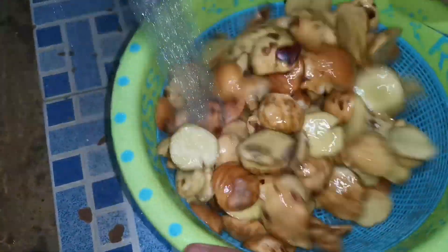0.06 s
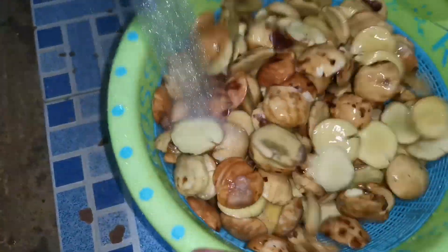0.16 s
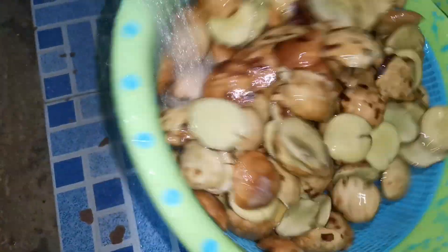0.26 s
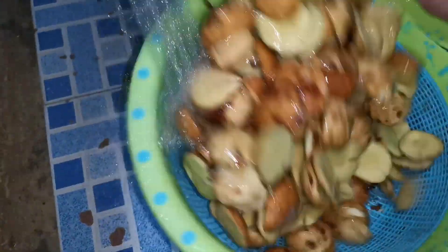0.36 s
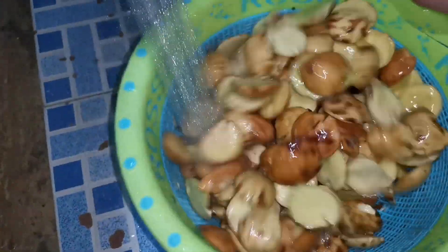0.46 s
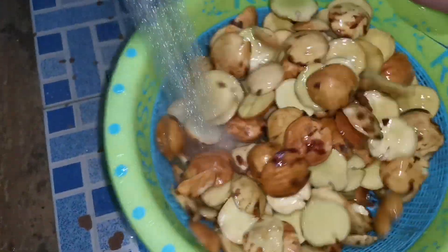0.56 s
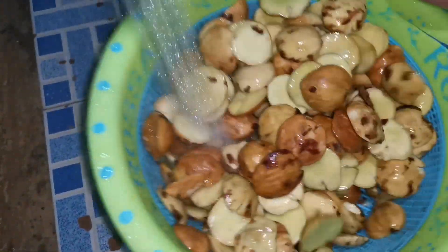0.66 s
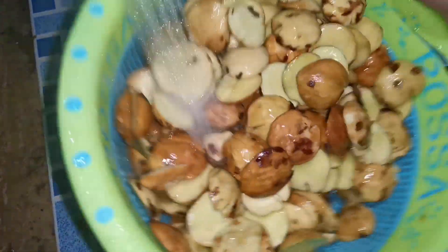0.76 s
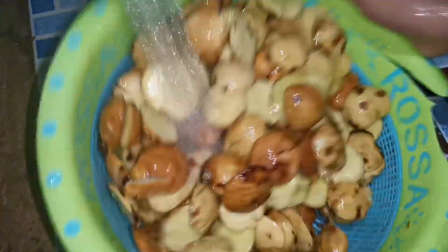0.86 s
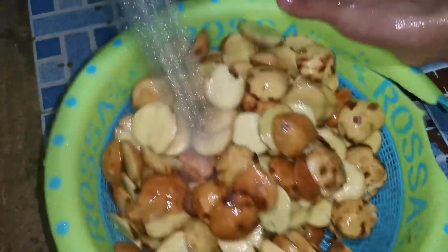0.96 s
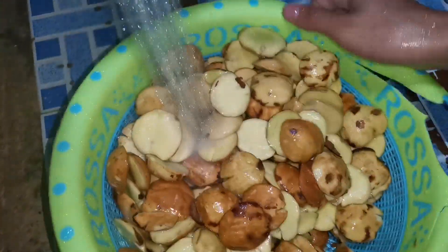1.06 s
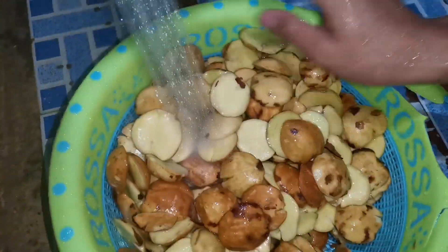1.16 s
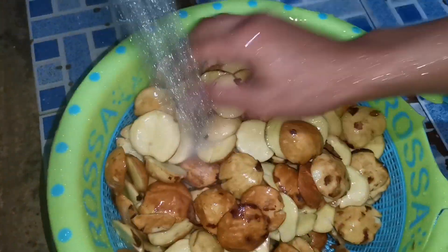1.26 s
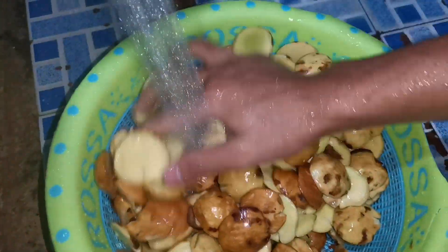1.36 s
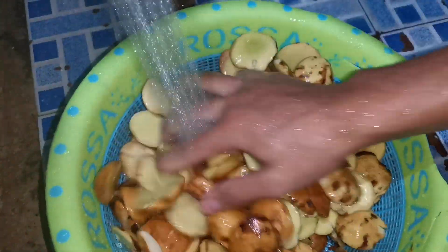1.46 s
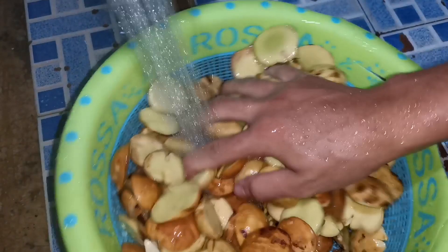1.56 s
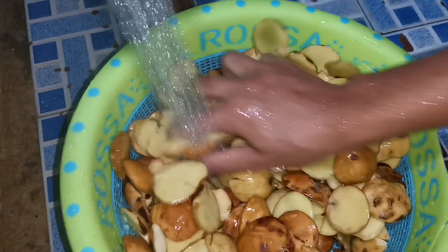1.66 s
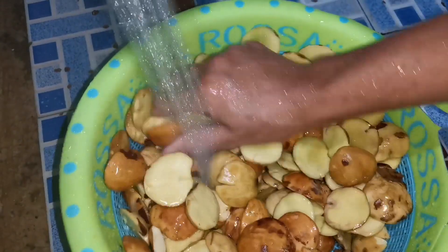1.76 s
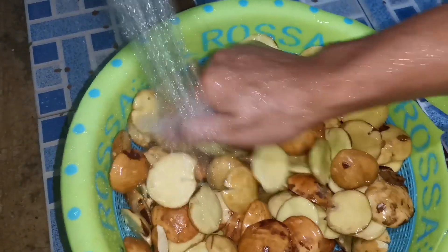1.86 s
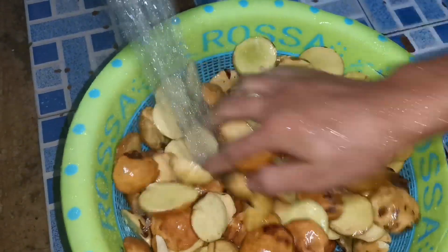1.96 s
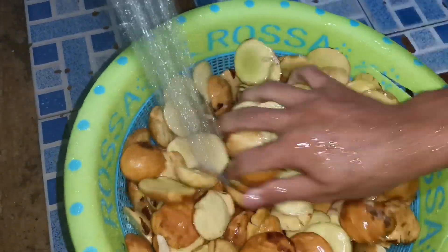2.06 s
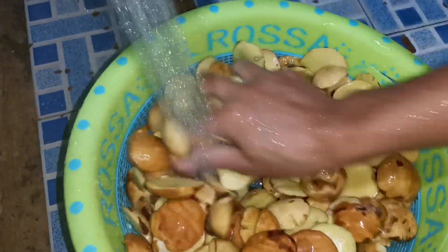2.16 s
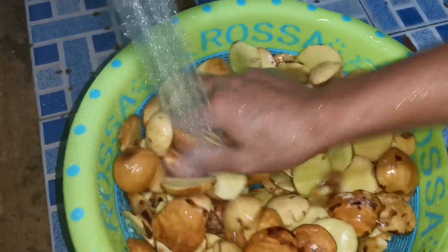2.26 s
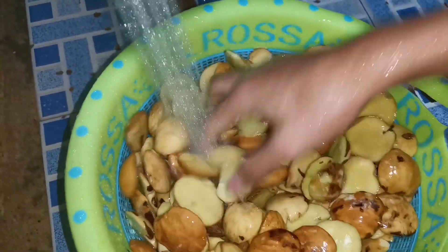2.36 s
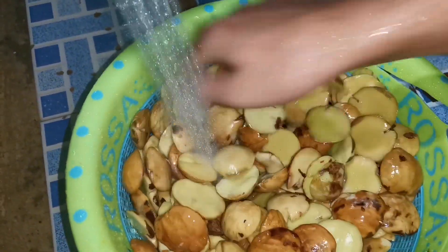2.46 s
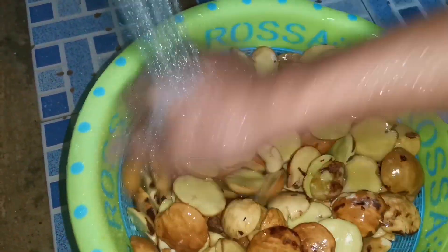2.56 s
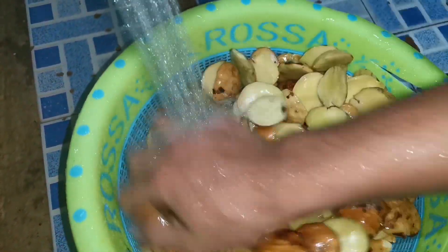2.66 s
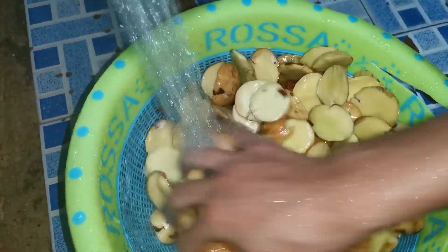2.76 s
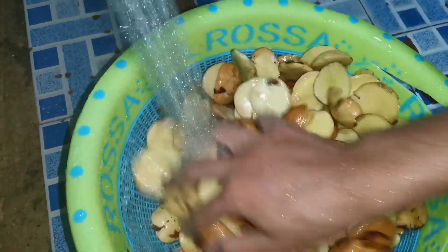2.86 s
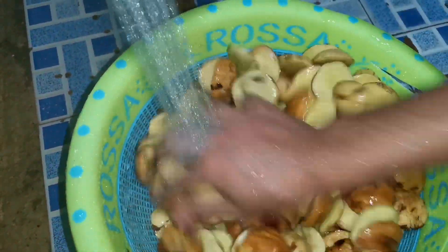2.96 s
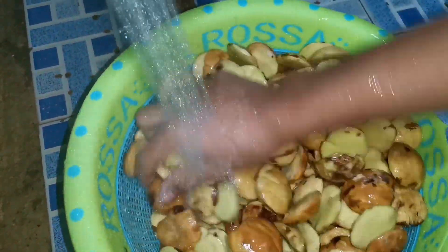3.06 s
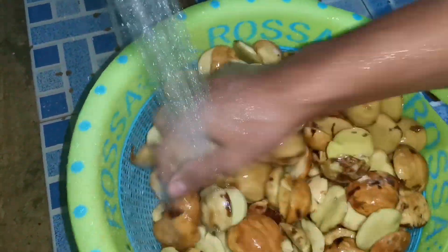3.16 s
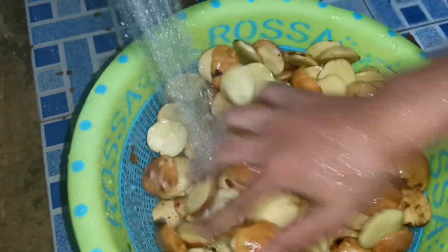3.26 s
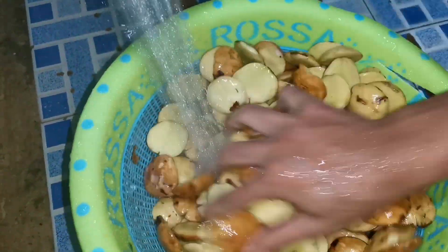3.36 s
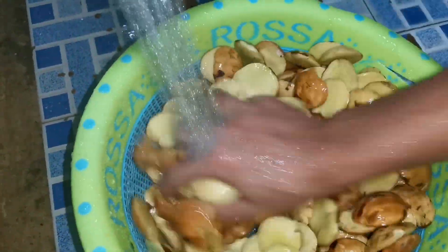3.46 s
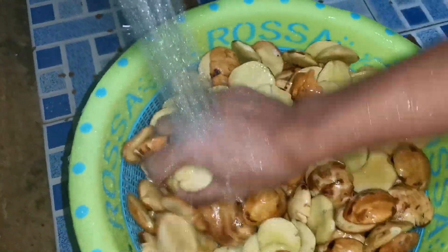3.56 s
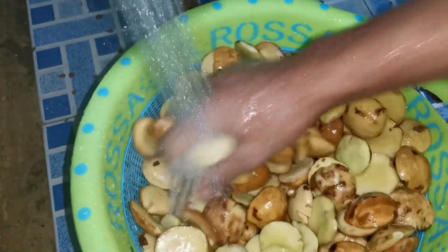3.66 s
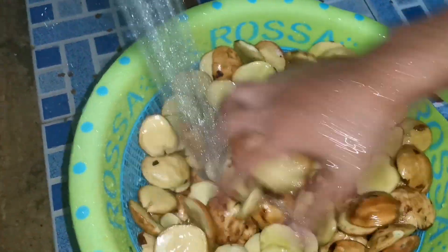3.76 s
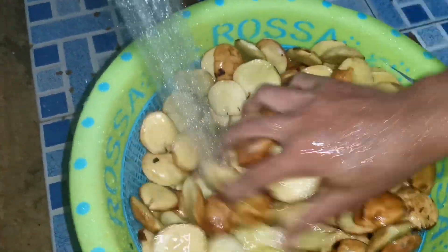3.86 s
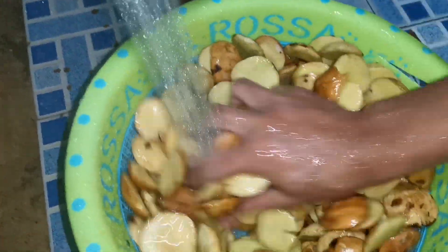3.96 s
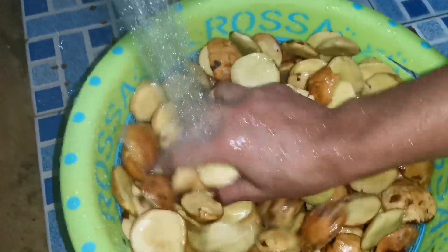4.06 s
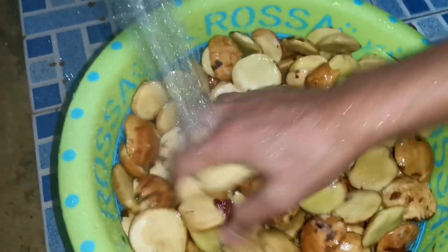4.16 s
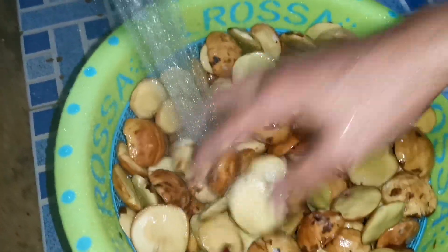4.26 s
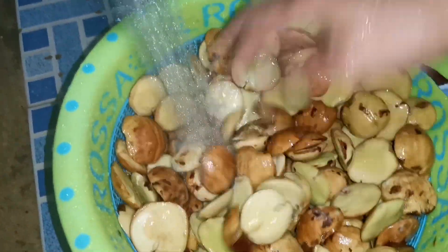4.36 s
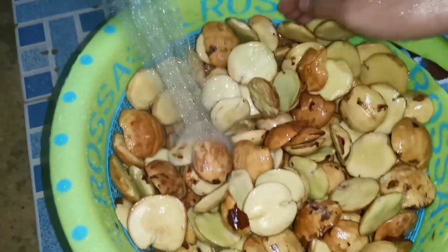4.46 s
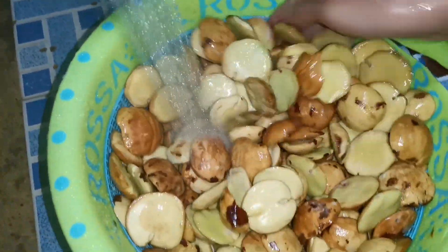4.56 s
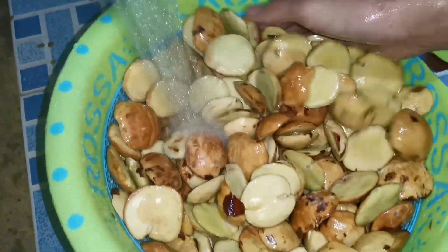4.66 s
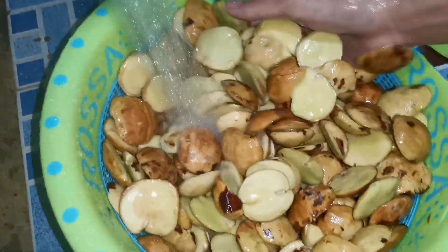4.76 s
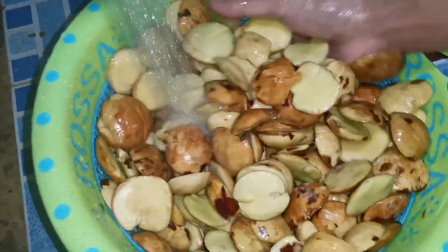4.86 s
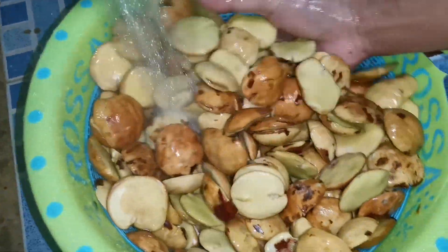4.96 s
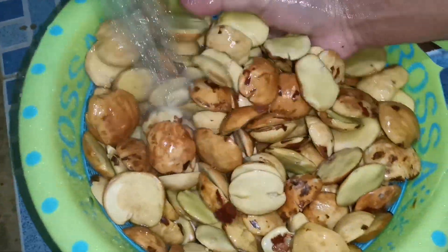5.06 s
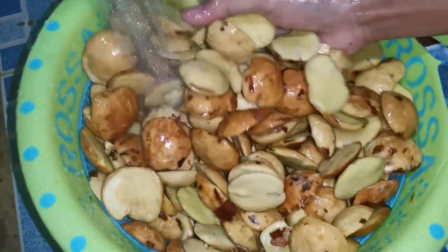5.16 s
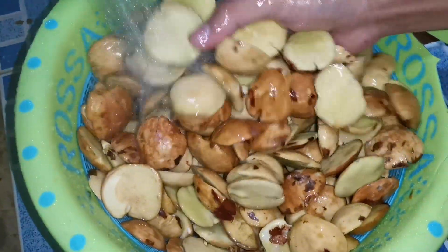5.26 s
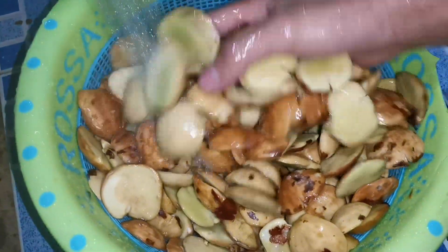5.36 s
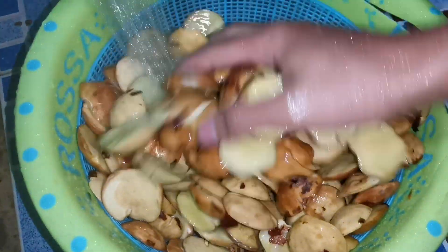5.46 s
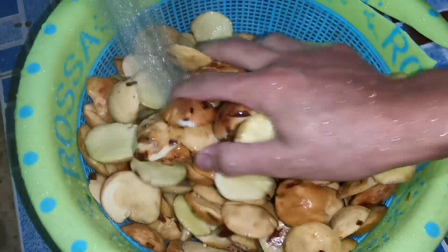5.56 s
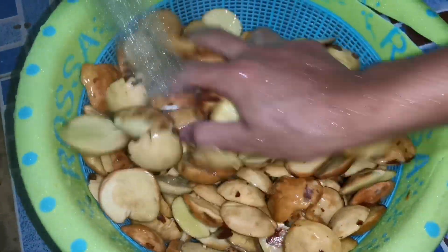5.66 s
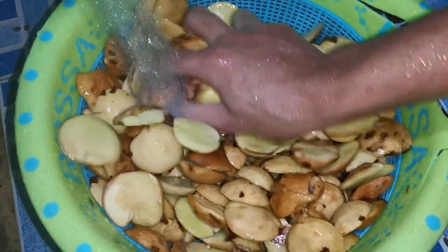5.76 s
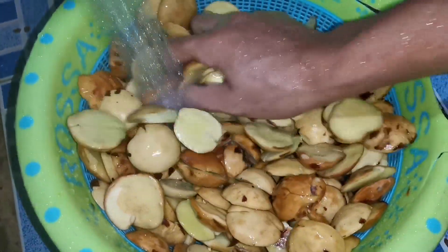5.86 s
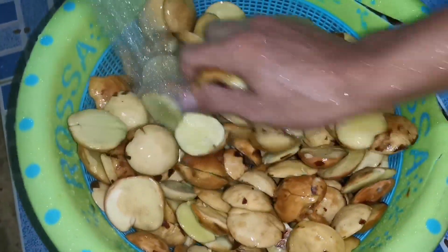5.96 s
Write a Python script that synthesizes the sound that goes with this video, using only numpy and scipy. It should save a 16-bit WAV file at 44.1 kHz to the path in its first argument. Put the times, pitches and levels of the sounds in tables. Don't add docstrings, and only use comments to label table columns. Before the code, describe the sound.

Three rattling tosses of hard wet pieces in a plastic basket under a splashing tap, then gentle stirring, ticking drops and a low engine hum.

```python
import sys
import numpy as np
from scipy import signal
from scipy.fft import rfft, irfft
from scipy.io import wavfile
from scipy.ndimage import uniform_filter1d

SR = 44100
rng = np.random.default_rng(int(sys.argv[2]) if len(sys.argv) > 2 else 0)


def volts(x):
    e = np.asarray(x, float) / 20
    return 10 ** e


def transcribe(u):
    v = np.clip(np.atleast_2d(u).T, -1, 1)
    q = np.round(v * 32767).astype(np.int16)
    wavfile.write(sys.argv[1], SR, q)


N = 264600
SWELL_SHAPE = 1.51


def rms_one(x):
    return x / np.sqrt(np.mean(x ** 2) + 1e-20)


def in_time(rows):
    s, *columns = np.transpose(rows)
    return [np.interp(np.arange(N) / SR, s, c) for c in columns]


def at_hz(points, hz):
    points = np.array(points)
    return np.interp(np.log(hz), np.log(points[:, 0]), points[:, 1])


def drift(rate):
    r = np.exp(-80 * np.pi * rate / SR)
    slow = signal.lfilter([1], [1, -2 * r, r * r], rng.standard_normal(N // 40 + 2002))[2000:]
    return np.interp(np.arange(N) / 40, np.arange(len(slow)), rms_one(slow))


def grains(per_s, spread_db):
    sizes_db = spread_db * np.minimum(rng.exponential(1, (2, N)), 4)
    sizes = volts(sizes_db) * rng.choice([-1, 1], (2, N))
    return rms_one(sizes * (rng.random((2, N)) < per_s / SR)) + 1e-18


def coloured(x, spectrum):
    hz = np.maximum(np.fft.rfftfreq(N, 1 / SR), 1)
    lowest = spectrum[0][0]
    edge_db = np.where(hz < lowest, 30 * np.log2(hz / lowest), 0)
    return rms_one(irfft(rfft(x) * volts(at_hz(spectrum, hz) + edge_db), N))


def resonance(x, hz, width):
    r = np.exp(-np.pi * width / SR)
    zeros = np.array([1, 0, -1]) * (1 - r * r) / 2
    return signal.lfilter(zeros, [1, -2 * r * np.cos(2 * np.pi * hz / SR), r * r], x)


def band(x, low_hz, high_hz):
    return signal.sosfilt(signal.butter(2, [low_hz, high_hz], "band", fs=SR, output="sos"), x)


def swells(rows, shape=SWELL_SHAPE):
    rows = np.array(rows)
    apart = (np.arange(0, N, 49) / SR - rows[:, :1]) / rows[:, 1:2]
    return np.exp(-np.abs(apart) ** shape)


def stretch(coarse):
    return np.interp(np.arange(N) / 49, np.arange(len(coarse)), coarse)


def summed_db(rows, db, rest_db, shape=SWELL_SHAPE):
    power = volts(np.array(db)) ** 2 @ swells(rows, shape) ** 2 + volts(rest_db) ** 2
    return stretch(10 * np.log10(power))


def stream():
    # (time [s], level [dB])
    flow = [(0, 6), (.35, 4.5), (.73, 2), (1.37, 3), (1.72, 5.5), (2.0, 2.5), (2.17, 2), (3.26, 5.5),
            (3.36, 0), (3.81, 5.5), (3.86, 1.5), (4.14, 8), (4.45, 3.7), (5.05, 6.5), (5.41, 0.5), (6, 4)]
    # (time [s], half-length [s], loss [dB], share of the loss in the lower bands)
    breaks = [(0.0, 0.011, 16, 0.3), (0.102, 0.044, 14, 0.8), (0.213, 0.039, 4.5, 1.8),
              (0.456, 0.062, 6.5, 1), (0.624, 0.043, 5.5, 1.7), (1.46, 0.053, 5, 1.6),
              (1.652, 0.076, 12.5, 0.7), (2.1, 0.046, 9.5, 0.26), (2.954, 0.28, 2.5, 2.4),
              (3.32, 0.019, 3, 2.5), (4.046, 0.28, 2.3, 2.4), (4.36, 0.031, 9, .8), (4.81, 0.48, 2.5, 2.35),
              (5.41, 0.29, 0.24, 2.5), (6.0, 0.22, 2.5, 2.5)]
    # (time [s], half-length [s], level [dB])
    sloshes = [(0.0, 0.034, -36), (0.123, 0.089, -32), (0.548, 0.077, -31.5), (0.306, 0.13, -42),
               (1.733, 0.12, -40.5), (2.074, 0.073, -43.5), (2.833, 0.48, -45), (3.43, 0.13, -41),
               (3.883, 0.059, -40.5), (4.19, 0.29, -42.5), (4.975, 0.093, -41.5), (6.0, 0.26, -46)]
    flow_db, = in_time(flow)
    _, _, loss_db, reach = np.transpose(breaks)
    high_loss = stretch(loss_db @ swells(breaks))
    low_loss = stretch(loss_db * reach @ swells(breaks))
    slosh = volts(summed_db(sloshes, np.array(sloshes)[:, 2], -90))
    splash = np.hypot(volts(-44.5 + 0.022 * flow_db - 0.34 * low_loss), slosh)
    sizzle = np.hypot(volts(-48.5 + flow_db - low_loss), slosh * volts(-11.5))
    mist_db = -43 + flow_db - high_loss
    return 20 * np.log10(splash), 20 * np.log10(sizzle), mist_db


def spray():
    # (frequency [Hz], level [dB])
    water = [(300, -9), (550, -3), (950, -4), (1700, -5.5), (2500, -6.5), (3600, -4.5), (4900, -3),
             (5900, -10), (7000, -5.5), (8200, -9.5), (10500, 6), (12700, 1), (14000, -4.5), (15600, -9.5)]
    patchy_db, shared_db = 1.25, 1.0
    splash_db, sizzle_db, mist_db = stream()
    drops = coloured(0.73 * rng.standard_normal((2, N)) + 0.66 * grains(2500, 4.0), water)
    splash_db = splash_db - 20 * np.log10(np.std(band(drops, 2000, 5200)))
    sizzle_db = sizzle_db - 20 * np.log10(np.std(band(drops, 5600, 7600))) + 4
    mist_db = mist_db - 20 * np.log10(np.std(band(drops, 8800, 14000)))
    place = 3 * np.log2(np.fft.rfftfreq(N, 1 / SR) / 1500 + 1)
    together = drift(10.2) + 1.06 * drift(41)
    spectrum, out = rfft(drops), 0
    for k, level_db in enumerate([splash_db] * 7 + [sizzle_db] * 2 + [mist_db] * 3):
        window = np.cos(np.pi / 2 * np.clip(place - k, -1, 1)) ** 2
        flicker_db = shared_db * together + patchy_db * (drift(5.9) + 0.9 * drift(28))
        out = out + irfft(spectrum * window, N) * volts(level_db + flicker_db)
    return volts(-1.0) * out


def trickle():
    cycles = 65.0
    born = grains(300 * volts(1.9 * drift(51)), 0.68)
    dealt = rng.integers(0, 24, N)
    rings = 0
    for k, hz in enumerate(np.geomspace(900, 6000, 24)):
        mine = born * (dealt == k) + 1e-18
        rings = rings + resonance(mine, hz, hz / cycles) * np.sqrt(2000 / hz)
    splash_db = stream()[0]
    return rms_one(rings) * volts(splash_db - 13)


def hollow():
    # (time [s], length [s], pitch [Hz], level [dB])
    cavities = [(0.268, 0.17, 4700, -38), (0.784, 0.096, 5100, -56), (0.856, 0.068, 6650, -66),
                (1.066, 0.042, 3000, -36), (1.542, 0.048, 4600, -29.5), (1.676, 0.069, 4750, -31.5),
                (1.677, 0.042, 2160, -29), (2.033, 0.067, 3920, -31), (2.203, 0.044, 4300, -31),
                (2.614, 0.04, 3000, -37), (2.493, 0.033, 4300, -35), (2.837, 0.1, 5000, -36),
                (3.228, 0.073, 3870, -35), (3.396, 0.25, 3140, -43), (3.715, 0.18, 5000, -51),
                (3.856, 0.081, 2900, -41), (4.015, 0.091, 4980, -32.5), (4.206, 0.14, 4970, -34),
                (4.134, 0.1, 4570, -34), (4.13, 0.11, 6000, -39.5), (4.14, 0.14, 6950, -35),
                (4.952, 0.25, 4870, -37), (4.993, 0.25, 2990, -46.5), (4.933, 0.19, 2750, -41),
                (5.546, 0.15, 4970, -41.5), (5.723, 0.061, 2780, -35.5)]
    out = np.zeros((2, N))
    for (s, length, hz, db), noise in zip(cavities, rng.standard_normal((len(cavities), 2, 16000))):
        count = min(round(length * SR), 16000)
        width = hz / (42.0 * length / 0.41)
        hiss = resonance(resonance(noise, hz, width), hz, width)[:, :count]
        at = round(s * SR)
        out[:, at:at + count] += volts(db - 8.5) * rms_one(hiss) * np.hanning(count) ** 0.5
    return out


def motion():
    # (time [s], half-length [s], clatter level [dB], tray thud level [dB])
    tosses = [(.01, 0.015, -22.5, -35), (0.097, 0.031, -21.5, -28.5), (0.158, 0.043, -17.5, -30),
              (0.232, 0.012, -27, -29), (0.278, 0.036, -35, -39), (0.52, 0.036, -20.5, -30),
              (0.575, 0.07, -25, -30), (0.74, 0.08, -34.5, -43.5), (0.867, 0.0091, -46.5, -34.5),
              (1.006, 0.031, -26, -33.5), (1.051, 0.034, -24, -39)]
    # (time [s], half-length [s], clatter level [dB])
    stirs = [(1.303, 0.64, -47.5), (1.695, 0.2, -45.5), (1.84, 0.034, -44), (2.201, 0.15, -42),
             (2.296, 0.027, -43.5), (2.596, 0.5, -47.5), (2.984, 0.26, -47.5), (3.027, 0.034, -42.5),
             (3.103, 0.029, -39.5), (3.183, 0.011, -36.5), (3.532, 0.13, -39), (3.735, 0.026, -95),
             (4.024, 0.098, -39), (4.21, 0.029, -48), (4.378, 0.054, -40.5), (4.64, 0.25, -45),
             (4.814, 0.043, -44.5), (4.938, 0.072, -49), (5.57, 0.26, -45), (5.814, 0.052, -41),
             (5.932, 0.034, -40)]
    tossed = [(s, length, db - 9, thud_db) for s, length, db, thud_db in tosses]
    stirred = [(s, length, db - 3, db - 1.5) for s, length, db in stirs]
    rows = np.array(tossed + stirred)
    shape = np.array([[1.7]] * len(tosses) + [[SWELL_SHAPE]] * len(stirs))
    return summed_db(rows, rows[:, 2], -58.5, shape), summed_db(rows, rows[:, 3], -51, shape)


def tumble():
    # (frequency [Hz], width [Hz], level [dB])
    colander = [(460, 1100, 11), (1090, 120, 25.5), (1623, 47, 19), (1850, 50, 26), (2380, 90, 21.5),
                (4070, 73, 18), (4370, 17, -19)]
    # (frequency [Hz], level [dB])
    pieces = [(150, -17), (250, -0.5), (327, -5), (521, 3.5), (588, -48), (653, -1), (1090, -0.5),
              (1320, 3.5), (4520, -12.5), (5250, -11), (9000, -42), (11700, -53), (19800, -120)]
    tumble_db, thud_db = motion()
    per_s = 2200 * volts(0.34 * (tumble_db + 33.5) + 3.2 * drift(40))
    contacts = grains(np.clip(per_s, 1200, 8000), 3.6)
    contacts = contacts / np.sqrt(uniform_filter1d(contacts ** 2, 900) + .03)
    scrunch = rfft(rng.standard_normal(200) * volts(-60 * np.arange(200) / SR / .004))
    contacts = signal.fftconvolve(contacts, irfft(scrunch / np.abs(scrunch))[None], axes=1)[:, :N]
    body = 0
    for k, (hz, width, db) in enumerate(colander):
        mode = resonance(contacts, hz, max(2.7 * width, 30)) * np.sqrt(300 / width)
        body = body + (-1) ** k * volts(db) * mode
    dealt = np.repeat(rng.integers(0, 16, N // 60 + 1), 60)[:N]
    clacks = 0
    for k, hz in enumerate(np.geomspace(520, 7500, 16)):
        mine = contacts * (dealt == k) + 1e-18
        clacks = clacks + resonance(mine, hz, 1.77 * hz / 10.0) * volts(at_hz(pieces, hz))
    clatter = rms_one(clacks) + 0.89 * rms_one(body)
    clatter = clatter / np.std(band(clatter, 330, 1730))
    thud = band(rms_one(contacts) + .5 * rng.standard_normal((2, N)), 150, 565)
    thud = rms_one(thud) + 0.07 * rms_one(resonance(thud, 257, 30))
    return clatter * volts(tumble_db) + thud * volts(thud_db - 3)


def hits(events, longer, crack_share, crack_hz, push_share):
    out, t = np.zeros((2, N + 2000)), np.arange(2000) / SR
    for (s, peak_db, hz), noise in zip(events, rng.standard_normal((len(events), 2, 2000))):
        turn = 2 * np.pi * hz * t + np.array([[0], [-np.pi / 2]])
        ringing = np.sin(turn) + .25 * (np.sin(1.17 * turn) + np.sin(.78 * turn))
        crack = crack_share * band(noise * volts(-60 * t / .01), *crack_hz)
        push = push_share * np.sin(2 * np.pi * 330 * t) * volts(-60 * t / 0.011)
        fading = np.exp(-(t / (longer * .0036)) ** 2) + .2 * volts(-60 * t / (longer * .03))
        onset = np.minimum(t / 0.0004, 1)
        at = round(s * SR)
        out[:, at:at + 2000] += volts(peak_db - 5) * (ringing * fading + crack + push) * onset
    return out[:, :N]


def knocks():
    # (time [s], peak level [dB], pitch [Hz])
    toss_knocks = [(0.009, -15.5, 3430), (0.061, -26, 2920), (0.078, -16, 2320), (0.084, -19, 2550),
                   (0.098, -10.5, 2600), (0.111, -10.5, 1480), (0.117, -20, 1090), (0.134, -17, 1190),
                   (0.158, -14, 1520), (0.158, -22, 1080), (0.161, -11.5, 1120), (0.166, -12.5, 970),
                   (0.171, -12, 1220), (0.176, -14, 1470), (0.184, -19, 1090), (0.2035, -11, 2480),
                   (0.215, -11.5, 1800), (0.221, -19, 860), (0.286, -19, 1890), (0.477, -27, 826),
                   (0.49, -16.5, 2520), (0.508, -19, 700), (0.508, -18, 835), (0.516, -19, 1330),
                   (0.521, -16, 1130), (0.534, -14, 940), (0.539, -16, 1150), (0.547, -15, 775),
                   (0.555, -16.5, 2400), (0.569, -21, 2680), (0.58, -14.5, 910), (0.585, -9.5, 1790),
                   (0.59, -19, 2370), (0.599, -14.5, 934), (0.614, -33, 960), (0.625, -25, 900),
                   (0.683, -28, 750), (0.735, -28, 780), (0.862, -32, 920), (0.981, -10.5, 1260),
                   (0.994, -20, 1070), (1.0, -15, 1030), (1.012, -17, 1200), (1.018, -14.5, 814),
                   (1.035, -21, 910), (1.055, -27, 3240), (1.06, -44, 703), (1.06, -20, 2930),
                   (0.079, -33, 4730), (0.111, -21, 4450), (0.134, -35, 4800), (0.15, -19, 2500),
                  (0.16, -19, 4380), (0.182, -15, 2570), (0.186, -23, 1010), (0.213, -23, 1080),
                  (0.483, -26, 3400), (0.497, -25, 4500), (0.509, -20, 2700), (0.517, -16, 2280),
                  (0.54, -23, 4600), (0.562, -18, 2550), (0.585, -28, 4350), (0.605, -20, 2300),
                  (0.622, -29, 2480), (0.98, -22, 2680), (1.012, -23.5, 4700), (1.036, -16.5, 2390),
                  (1.049, -23, 2450), (1.063, -25, 1120), (1.062, -23, 4420), (1.068, -24, 3370),
                  (1.075, -20, 3920)]
    stir_knocks = [(1.282, -32, 1120), (1.302, -30, 1050), (1.371, -28, 930), (1.408, -40, 3900),
                   (1.549, -31, 4160), (1.68, -25, 4220), (1.811, -36, 2560), (2.032, -24, 3936),
                   (2.063, -18.5, 3930), (2.222, -26, 4200), (2.327, -24.5, 3970), (2.457, -25, 2320),
                   (2.482, -29, 4456), (2.558, -21.5, 3880), (2.676, -22.5, 2380), (2.722, -38, 1020),
                   (2.908, -28, 1090), (3.037, -24, 1090), (3.055, -26, 1530), (3.08, -33, 1210),
                   (3.107, -21, 880), (3.178, -31, 740), (3.288, -21, 4000), (3.462, -36, 1050),
                   (3.5, -30, 980), (3.52, -27, 886), (3.538, -21.5, 925), (3.701, -29, 1110),
                   (3.746, -33, 925), (3.857, -36, 1090), (3.877, -22.5, 2470), (3.948, -27, 680),
                   (4.003, -34, 680), (4.048, -26.5, 930), (4.072, -26.5, 3040), (4.103, -26.5, 1050),
                   (4.142, -22.5, 4600), (4.183, -29, 1200), (4.363, -23, 2480), (4.399, -38, 1230),
                   (4.522, -31, 1050), (4.623, -35, 2334), (4.638, -27.5, 800), (4.769, -43, 950),
                   (4.816, -30, 4320), (4.907, -27.5, 1226), (5.05, -32, 3900), (5.441, -29, 830),
                   (5.582, -32, 1080), (5.604, -22, 1040), (5.727, -30, 1040), (5.758, -28.5, 980),
                   (5.825, -23.5, 880), (5.93, -29.5, 925), (5.966, -36, 1130),
                   (2.24, -25, 4640), (2.91, -20.5, 3740), (3.096, -23, 704), (3.101, -37, 900),
                   (3.118, -25.5, 1190), (3.125, -25, 1380), (5.835, -30, 1040), (2.318, -30, 600),
                   (2.612, -26, 4900), (2.745, -27, 5200), (3.19, -26, 2300), (5.443, -26, 4000),
                   (5.736, -24.5, 1060), (5.792, -29, 4540), (5.818, -28, 960), (5.842, -24, 940),
                   (5.967, -28, 3930), (4.367, -30, 2730), (1.789, -23, 4100)]
    spits = [(0.0767, -21, 4370), (0.6863, -28, 11600), (1.5414, -31, 4620), (2.2593, -34, 11650),
             (2.4613, -21.5, 11900), (2.7786, -35, 11010), (2.9949, -25, 11300), (3.0889, -23, 11600),
             (3.1456, -19, 10700), (3.5418, -17, 4830), (3.5709, -27, 5400), (3.5901, -22, 11300),
             (3.9415, -25, 11200), (3.9595, -21, 4070), (4.6201, -31, 10700), (4.733, -21, 11700),
             (4.852, -21, 10600), (5.034, -19, 11300), (5.2794, -20, 6100), (5.8571, -35, 11160)]
    # (time [s], peak level [dB], pitch [Hz])
    bumps = [(1.365, -38, 293), (1.407, -37, 480), (1.6, -41, 250), (1.74, -39, 249), (1.831, -35, 574),
             (2.685, -30.5, 293), (2.938, -30.5, 523), (3.095, -36, 285), (3.429, -40, 286),
             (3.483, -33, 248), (3.929, -38, 254), (4.22, -33, 252), (4.36, -37, 253), (5.824, -37, 463)]
    tossed = volts(-2) * hits(toss_knocks, 1, .3, (600, 4500), .12)
    stirred = volts(-2) * hits(stir_knocks, .9, .4, (600, 3600), .2)
    flung = .6 * hits(spits, .5, 2.4, (4500, 15000), 0)
    bumped = hits(bumps, 3, 0, (200, 900), 0)
    return band(tossed + stirred + flung + bumped, 180, 17000)


def tiles(x):
    level_db, t60 = -12, .1
    t = np.arange(6000) / SR
    tail = rng.standard_normal((2, 6000)) * volts(-60 * t / t60) * (t > .003)
    tail = tail / np.sqrt(np.sum(tail ** 2, axis=1, keepdims=True))
    return x + volts(level_db) * signal.fftconvolve(x[:1], tail, axes=1)[:, :N]


def engine():
    # (time [s], frequency [Hz])
    firing = [(0, 50.8), (.12, 48), (.45, 48.3), (.84, 48.7), (3.74, 48.65), (4.39, 47.95), (4.7, 47.6),
              (5.05, 47.2), (5.4, 45.6), (6, 45.3)]
    # (time [s], level [dB])
    loudness = [(0, -32), (.12, -42), (.25, -37.5), (.8, -43), (.88, -35.5), (1.22, -31), (1.32, -37.5),
                (1.5, -33), (1.68, -33.5), (2.1, -41), (2.18, -38), (2.59, -34), (2.76, -38.5), (3.5, -34),
                (3.76, -38.5), (4.2, -37.5), (4.95, -47), (5.1, -66), (6, -56)]
    # (order, level at a loudness of -38 dB [dB], share of the loudness swing, wavering [dB])
    orders = [(2, -58.5, 0.38, 5), (3, -39, 1.0, 1.86), (4, -58, 0.13, 2), (5, -48, 0.43, 1.26)]
    # (time [s], level [dB])
    throb = [(0.0, -55), (0.2, -63), (0.78, -49), (1.05, -65), (1.14, -51), (1.67, -47), (2.04, -72),
             (2.09, -57), (3.29, -51), (4.01, -54), (4.06, -71), (4.14, -57), (4.34, -53), (4.43, -61),
             (4.73, -52), (5.18, -69), (5.43, -44), (6.0, -63)]
    # (frequency [Hz], level [dB])
    street_spectrum = [(25, 2), (45, 19), (65, 15.5), (80, -8), (130, 12), (205, 3.5), (260, 7), (400, -30)]
    (hz,), (loud_db,) = in_time(firing), in_time(loudness)
    t, turn = np.arange(N) / SR, 2 * np.pi * np.cumsum(hz) / SR
    tones = np.sqrt(2) * volts(in_time(throb)[0] - 2.5) * np.sin(turn)
    for (order, db, share, waver_db), rate in zip(orders, [6.3, 9.6, 8.4, 11.4]):
        level_db = db + share * (loud_db + 38) + waver_db * drift(rate)
        tones = tones + np.sqrt(2) * volts(level_db) * np.sin(order * (turn + 1))
    street = rng.standard_normal((2, N))
    rumble = coloured(street, street_spectrum + [(900, -54)]) * volts(-52 + 0.18 * drift(25.0))
    boom = rms_one(resonance(resonance(street, 195.4, 26), 195.4, 26)) * volts(-42.5 - 4 * t)
    rough_db = np.maximum(-47 - 0.5 * t, -55 + 8 * (t - 5.5))
    rough = rms_one(band(street, 133.5, 187.0)) * volts(rough_db)
    return tones * np.array([[1], [0]]) + rumble + boom + rough


def ports(heard):
    # (frequency [Hz], level [dB])
    balance = [(600, 1.6), (1000, -4.0), (1800, -1.3), (3000, -6.6), (5000, -4.7), (6300, -3.3),
               (7200, 3.0), (8000, 8.0), (8800, 5.8), (9800, -1.5), (10800, -6.5), (12500, -5.5),
               (14000, 0.7), (15400, 8.1)]
    # (frequency [Hz], share)
    likeness = [(200, .95), (600, 0.56), (950, 0.66), (1500, 0.54), (2000, 0.3), (3700, 0.39), (6000, 0.35),
                (10500, 0.35), (15000, 0.3)]
    # (frequency [Hz], phase [rad])
    port_lead = [(0, 0), (500, .1), (1120, 1.0), (1800, 3), (3500, 9.4), (5200, 15.7), (16000, 54.5),
                 (23000, 79)]
    hz = np.maximum(np.fft.rfftfreq(N, 1 / SR), 1)
    both, own = rfft(heard)
    alike = np.clip(at_hz(likeness, hz) + np.clip(1 - hz / 200, 0, 1) * .2, 0, .99)
    lead = np.interp(hz, *np.transpose(port_lead))
    balance_db = at_hz([(400, 0.0039)] + balance[:-1] + [(14600, 2), (15200, 4)], hz)
    right = alike * both * np.exp(-1j * lead) + np.sqrt(1 - alike ** 2) * own
    return irfft(np.array([both, right * volts(-balance_db)]), N)


def scene():
    water = spray() + hollow() + trickle()
    return ports(water + tiles(tumble() + knocks()) + engine())


def band_limit(x):
    return signal.sosfilt(signal.butter(12, 15720, fs=SR, output="sos"), x)


def record(dry):
    cut = signal.cheby2(10, 35, [27, 16250], "band", fs=SR, output="sos")
    return band_limit(signal.sosfilt(cut, dry))


dry = scene()
out = record(dry)
transcribe(out)
```